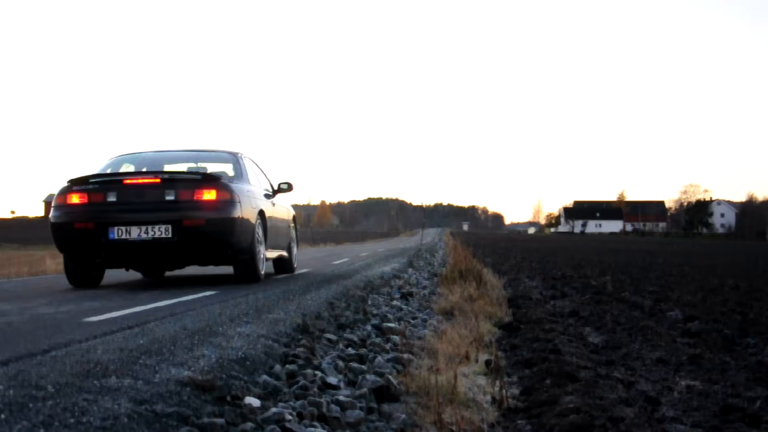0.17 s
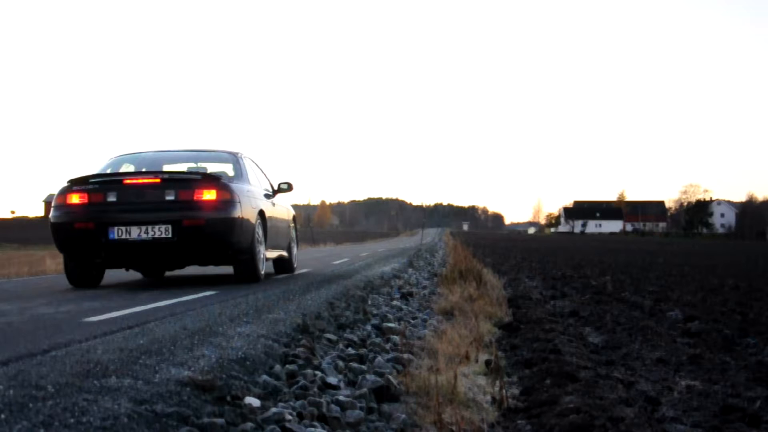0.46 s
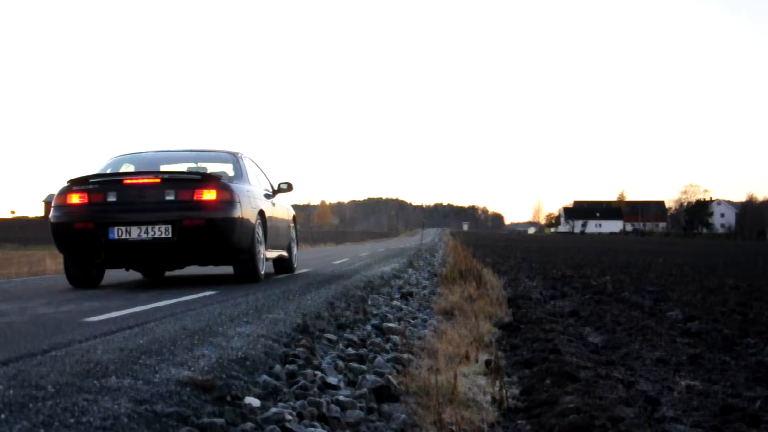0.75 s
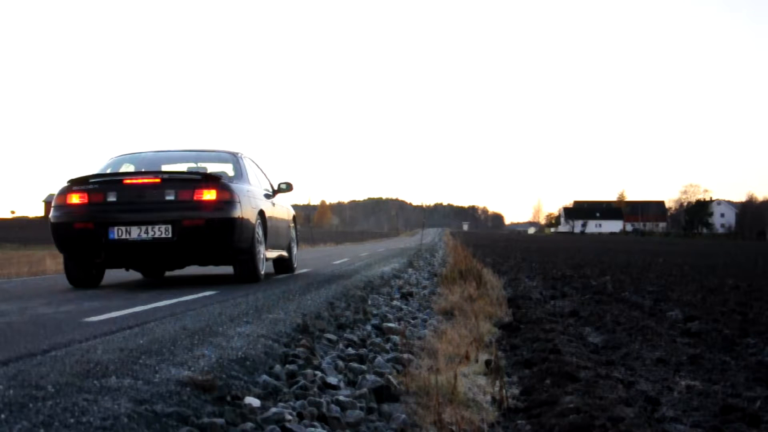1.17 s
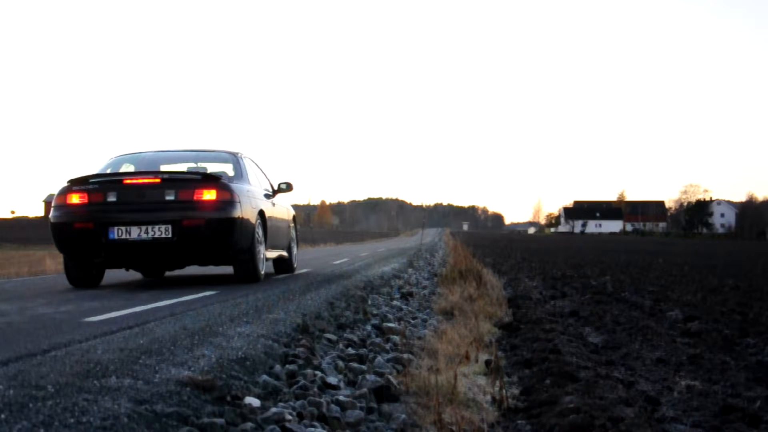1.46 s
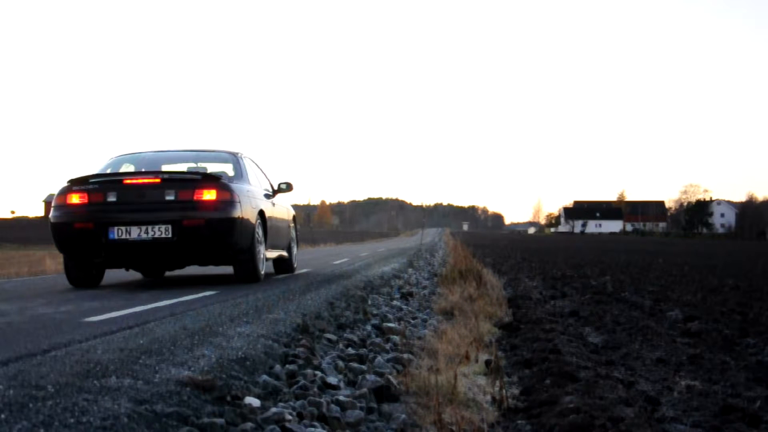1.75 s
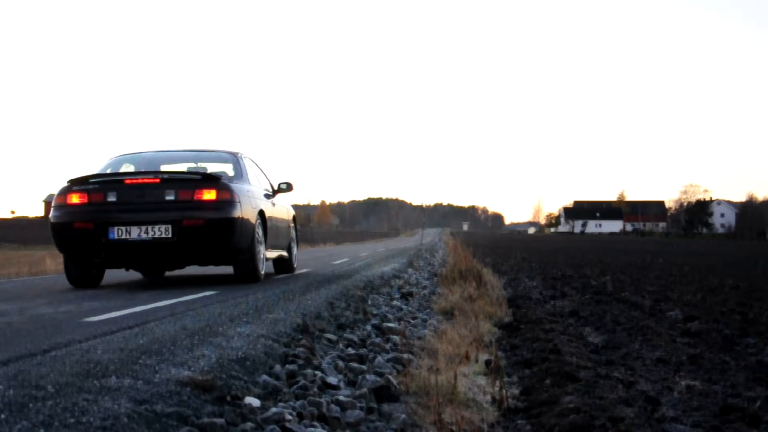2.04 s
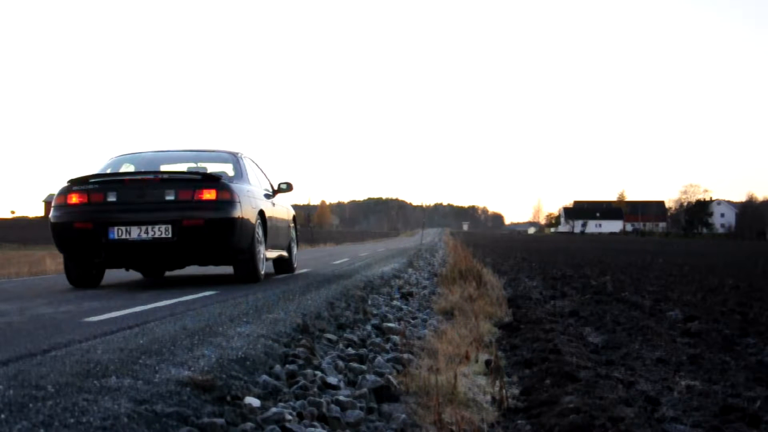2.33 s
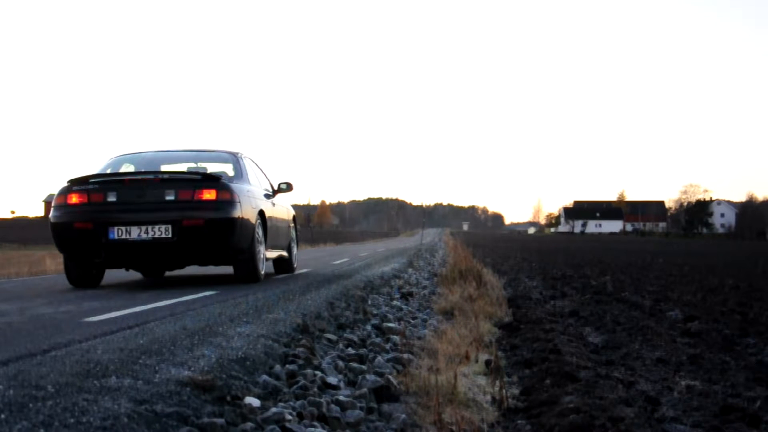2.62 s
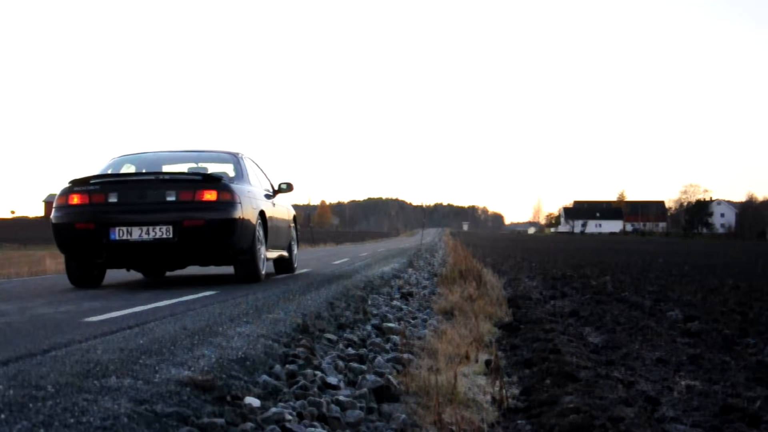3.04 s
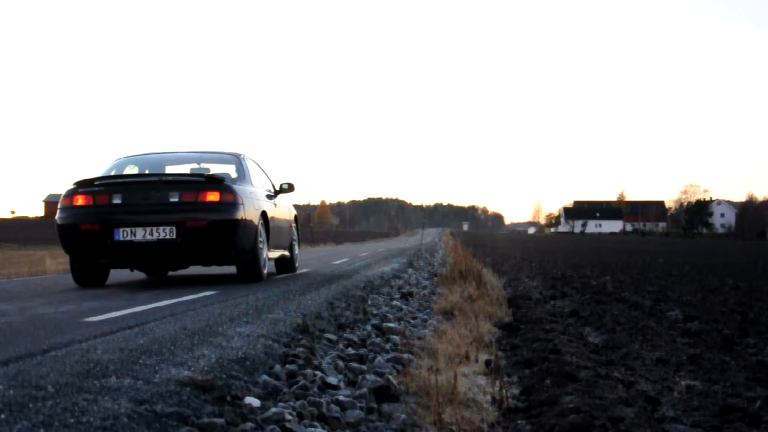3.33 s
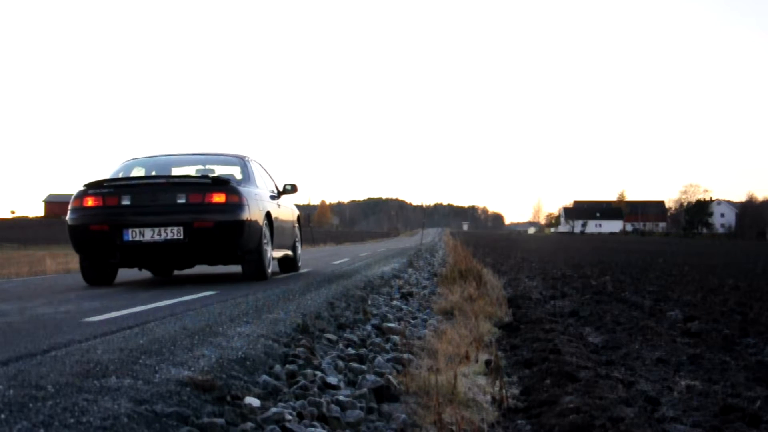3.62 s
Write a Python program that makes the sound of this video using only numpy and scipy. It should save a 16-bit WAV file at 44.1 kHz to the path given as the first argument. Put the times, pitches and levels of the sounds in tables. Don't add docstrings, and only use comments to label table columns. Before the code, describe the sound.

A four-cylinder car engine idles low and even a few metres away, with a few small metal clicks, then revs hard into a raspy growl on an open road; small, slightly dull outdoor microphone.

```python
import sys
import numpy as np
from scipy import signal
from scipy.fft import rfft, irfft
from scipy.io import wavfile
from scipy.ndimage import uniform_filter1d

SR = 44100
rng = np.random.default_rng(int(sys.argv[2]) if len(sys.argv) > 2 else 0)


def voltage_ratio(level):
    return 10 ** (np.asarray(level, float) / 20)


def materialize(psi):
    bounded = np.clip(np.atleast_2d(psi).T, -1, 1)
    quanta = np.round(bounded * 32767).astype(np.int16)
    wavfile.write(sys.argv[1], SR, quanta)


N = 167139


def rms_one(x):
    return x / np.sqrt(np.mean(x ** 2) + 1e-20)


def at_hz(points, hz):
    p = np.array(points)
    return np.interp(np.log(hz), np.log(p[:, 0]), p[:, 1])


def drift(rate):
    r = np.exp(-80 * np.pi * rate / SR)
    slow = signal.lfilter([1], [1, -2 * r, r * r], rng.standard_normal(N // 40 + 2002))[2000:]
    return np.interp(np.arange(N) / 40, np.arange(len(slow)), rms_one(slow))


def causal(x, points, fall_db=25.5, lag=1):
    size = 2 ** 15
    hz = np.maximum(np.arange(size // 2 + 1) * SR / size, 2)
    octaves_below = np.maximum(np.log2(points[0][0] / hz), 0)
    octaves_above = np.maximum(np.log2(hz / points[-1][0]), 0)
    level_db = at_hz(points, hz) - fall_db * (octaves_below + octaves_above)
    cep = irfft(np.log(voltage_ratio(level_db)))
    cep[1:size // 2] *= 2
    cep[size // 2 + 1:] = 0
    log = rfft(cep)
    response = np.roll(irfft(np.exp(log.real + 1j * lag * log.imag)), size // 2)
    return signal.fftconvolve(x, response)[size // 2:size // 2 + N]


def ring(x, hz, t60):
    r = voltage_ratio(-60 / (t60 * SR))
    w = 2 * np.pi * hz / SR
    return signal.lfilter([0, np.sin(w)], [1, -2 * r * np.cos(w), r * r], x + 1e-18)


def patchy(points, patchy_db):
    out = 0
    together = drift(3.0)
    edges = 200 * 2 ** np.arange(0, 6, .5)
    white = rng.standard_normal((2, N))
    for k, (low, high) in enumerate(zip(edges, edges[1:])):
        band_filter = signal.butter(2, [low, high], "band", fs=SR, output="sos")
        band = signal.sosfilt(band_filter, white[k % 2])
        out = out + band * voltage_ratio(patchy_db * (.5 * together + drift(12.0)))
    return rms_one(causal(out, points, fall_db=28.0))


FIRST_FIRING_S = .1100
IDLE_LOAD_DB, FULL_LOAD_DB = -59, -46
# [time_s, exhaust_level_db, load_level_db]
ENGINE = [(.1, -34.5, -63.5), (1.0, -34, -71), (1.999, -34, -66.5), (2.502, -34.5, -68.5),
          (2.599, -29.5, -67.5), (2.7, -24.5, -59), (2.801, -21, -53.5), (2.88, -17.5, -50),
          (2.961, -18, -48.5), (3.04, -19.5, -47), (3.108, -19, -44), (3.199, -19, -45),
          (3.32, -19.5, -44.5), (3.45, -21.5, -45), (3.6, -23, -44.5), (3.79, -21, -45.5)]
# [time_s, firings_per_s (Hz)]
SPEED = [(0.1, 27.29), (0.6, 27.91), (1.1, 28.23), (1.6, 27.69), (2.1, 28.19), (2.5, 28.03), (2.6, 30.12),
         (2.7, 33.47), (2.8, 39.5), (2.9, 47.19), (3.0, 56.46), (3.08, 61.07), (3.16, 65.17), (3.26, 67.28),
         (3.35, 68.62), (3.45, 66.36), (3.6, 61.46), (3.79, 55.97)]


def controls():
    time_s, exhaust_db, load_db = np.transpose(ENGINE)
    t = np.arange(N) / SR
    rate = uniform_filter1d(np.interp(t, *np.transpose(SPEED)), size=1500)
    turns = np.cumsum(rate) / SR
    turns = turns - np.interp(FIRST_FIRING_S, t, turns)
    load = (np.interp(t, time_s, load_db) - IDLE_LOAD_DB) / (FULL_LOAD_DB - IDLE_LOAD_DB)
    return turns, rate, np.interp(t, time_s, exhaust_db), load


ROAR_DB, ROAR_GATE = -39.5, 0.04
# [pitch_hz, level_db (dB per Hz)]
ROAR = [(230, -11.5), (344, -6.5), (560, -1), (1000, -3), (1500, -14.5), (2300, -23), (4600, -34),
        (9000, -65.5)]


def steady_roar(turns):
    pulse = 1 + ROAR_GATE * np.cos(2 * np.pi * (turns - .15))
    return voltage_ratio(ROAR_DB) * patchy(ROAR, patchy_db=1.03) * pulse


RUMBLE_DB, RUMBLE_FOLLOWS, RUMBLE_HZ = -46.5, 0.69, (80, 278)


def rumble(db):
    band_filter = signal.butter(2, RUMBLE_HZ, "band", fs=SR, output="sos")
    noise = signal.sosfilt(band_filter, rng.standard_normal(N))
    return rms_one(noise) * voltage_ratio(RUMBLE_DB + RUMBLE_FOLLOWS * (db - db.min()))


RUSH_DB, RUSH_GATE, RUSH_FOLLOWS = -37.5, .3, 1.0
# [pitch_hz, level_db (dB per Hz)]
RUSH = [(300, -11), (420, -5), (700, -11), (1100, -10), (1750, -15), (2400, -20), (4600, -29), (9000, -64)]
# [pitch_hz, width_hz, level_db]
WHINES = [(400, 25, -42.5), (1770, 140, -52), (3620, 35, -61), (4365, 160, -59), (6570, 480, -74.5)]


def rush(turns, load):
    pulse = 1 + RUSH_GATE * np.cos(2 * np.pi * (turns - .1))
    out = voltage_ratio(RUSH_DB) * pulse * patchy(RUSH, patchy_db=0.26)
    for pitch_hz, width_hz, level_db in WHINES:
        whine = rms_one(ring(rng.standard_normal(N), pitch_hz, 2.4 / width_hz))
        out = out + voltage_ratio(level_db + 2.9 * drift(12.0)) * whine
    return out * voltage_ratio(RUSH_FOLLOWS * (FULL_LOAD_DB - IDLE_LOAD_DB) * (load - 1))


RATTLE_FADE_DB, CLICK_CUT_HZ = 9.5, 9000
# [start_s, level_db, pitch_hz, rattle_length_s]
CLICKS = [
    (1.077, -58, 4000, 0.011),
    (1.129, -47.5, 2090, .02),
    (1.249, -37.5, 2720, .03),
    (1.624, -55, 3280, 0.0048),
    (1.644, -48, 2250, .014),
    (2.458, -54, 6000, .008),
]
# [pitch_hz, level_db, ring_time_s (60 dB fall)]
LINKAGE = [(1535, 5.5, 0.045), (2050, -3, .03), (2250, -1.5, 0.02), (2884, 0, 0.017), (3430, -5.5, 0.0086),
           (4000, -6.5, 0.016), (4560, -9, 0.009), (6300, -15, .006), (7900, -24, .006)]


def clicks():
    out = np.zeros(N)
    for mode_hz, mode_db, ring_time_s in LINKAGE:
        hits = np.zeros(N)
        for start_s, level_db, pitch_hz, length_s in CLICKS:
            late = np.r_[0, rng.random(11)]
            near_db = -6.0 * abs(np.log2(mode_hz / pitch_hz)) - RATTLE_FADE_DB * late
            hit_db = level_db + mode_db + near_db + rng.normal(0, 2.1, 12)
            at = ((start_s + length_s * late) * SR).astype(int)
            hits[at] = voltage_ratio(hit_db) * rng.choice([-1, 1], 12)
        out += ring(hits, mode_hz, ring_time_s)
    soften = signal.butter(2, CLICK_CUT_HZ, fs=SR, output="sos")
    return signal.sosfilt(soften, voltage_ratio(-2.5) * out)


SCATTER_DB, LOAD_SCATTER_DB, JITTER_S = .9, .4, .00008
IDLE_PUFF_DB, OPENING_DB = -32.5, 6
IDLE_LAG, LOAD_LAG = .78, .1
IDLE_UNEVEN = 0.1
STUMBLE_S, STUMBLE_DB = 2.963, -7
SLOW_CUT_HZ = 187
ECHO_S, ECHO_SHARE, ECHO_FROM_HZ, ECHO_FULL_HZ = 0.0085, 0.33, 42.3, 62.5
GROWL_HZ, GROWL_T60_S, GROWL_DB, FULL_GAIN_HZ_PER_S = 421, 0.052, 9, 56
CYLINDER_DB = [1.7, 0.86, -1.3, .5]
CYLINDER_LATE_S = [.0004, -.00025, -.00015, 0]
# [pitch_hz, level_db]
IDLE_PIPE = [(20, -43), (28, -22.5), (56, 2), (112, 1.5), (168, -2), (200, -12), (228, -13), (300, -29.5)]
# [pitch_hz, level_db]
LOAD_PIPE = [(40, -21.5), (62, 1.5), (95, -1.5), (135, -0.5), (188, -5.5), (225, -7), (290, -20.5),
             (520, -30.5)]


def exhaust(turns, rate, db):
    k = np.arange(-3, int(turns[-1]) + 1)
    chance = rng.standard_normal((400, 2))[:len(k)]
    at = np.interp(k, turns, np.arange(N)) + JITTER_S * SR * chance[:, 0]
    at = np.clip(at, 0, N - 1).astype(int)
    share = np.clip((db - IDLE_PUFF_DB) / OPENING_DB, 0, 1)
    late = (np.array(CYLINDER_LATE_S)[k % 4] * SR * share[at]).astype(int)
    at = np.clip(at + late, 0, N - 1)

    spread_db = SCATTER_DB + (LOAD_SCATTER_DB - SCATTER_DB) * share[at]
    uneven_db = np.array(CYLINDER_DB)[k % 4] * (IDLE_UNEVEN + (1 - IDLE_UNEVEN) * share[at])
    uneven_db[np.argmin(abs(at / SR - STUMBLE_S))] += STUMBLE_DB
    puffs = np.zeros(N)
    puffs[at] = voltage_ratio(uneven_db + spread_db * chance[:, 1] + db[at]) / np.sqrt(rate[at])

    idle = np.roll(causal(puffs * (1 - share), IDLE_PIPE, fall_db=16.0, lag=IDLE_LAG), 90)
    loaded = np.roll(causal(puffs * share, LOAD_PIPE, fall_db=18.5, lag=LOAD_LAG), 60)
    fast = np.clip((rate - ECHO_FROM_HZ) / (ECHO_FULL_HZ - ECHO_FROM_HZ), 0, 1)
    dull = signal.sosfiltfilt(signal.butter(1, SLOW_CUT_HZ, fs=SR, output="sos"), loaded)
    loaded = fast * loaded + (1 - fast) * voltage_ratio(1.5) * dull
    loaded = loaded + ECHO_SHARE * fast * np.roll(loaded, int(ECHO_S * SR))

    speed_gain = uniform_filter1d(np.gradient(rate) * SR, size=6000)
    gaining = np.clip(speed_gain / FULL_GAIN_HZ_PER_S, .25, 1)
    rasp = ring(puffs * fast * gaining, GROWL_HZ, GROWL_T60_S)
    rasp = ring(rasp, GROWL_HZ, 0.0093)
    growl = np.roll(rasp, 60) * 2 * np.pi * GROWL_HZ / SR
    return voltage_ratio(67.5) * idle + voltage_ratio(68.5) * loaded + voltage_ratio(GROWL_DB) * growl


def scene():
    turns, rate, db, load = controls()
    background = steady_roar(turns) + rumble(db)
    car = rush(turns, load) + clicks() + exhaust(turns, rate, db)
    return (background + car)[None]


OPEN_S, OPEN_FADE_S = 0.1158, 0.0037
# [pitch_hz, level_db]
MIC = [(20, 1.5), (4700, -1), (5500, -4), (6600, 1.5), (8000, -2.5), (10000, -10), (20000, -3.5)]


def microphone(dry):
    gate = np.clip((np.arange(N) / SR - OPEN_S) / OPEN_FADE_S, 0, 1)
    return causal(dry[0], MIC)[None] * gate


def top_cut(x):
    return signal.sosfilt(signal.butter(12, 10000, fs=SR, output="sos"), x)


def record(dry):
    heard = microphone(dry)
    return top_cut(heard)


dry = scene()
out = record(dry)
materialize(out)
```